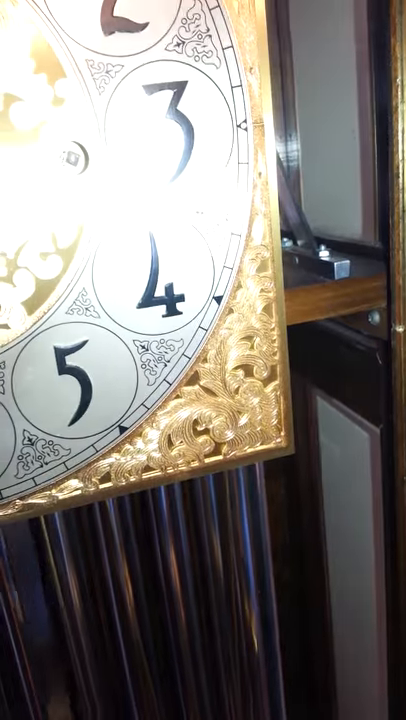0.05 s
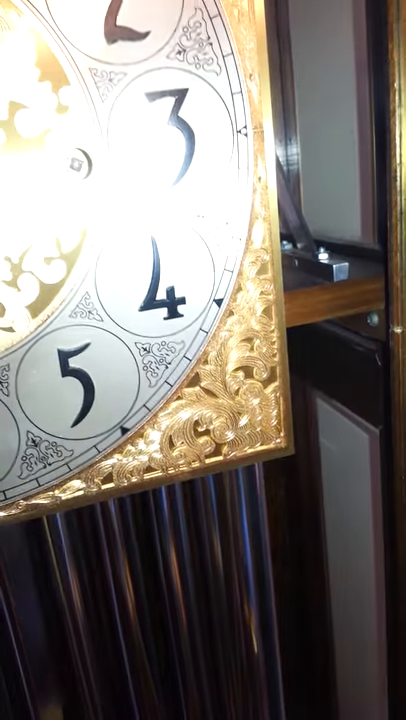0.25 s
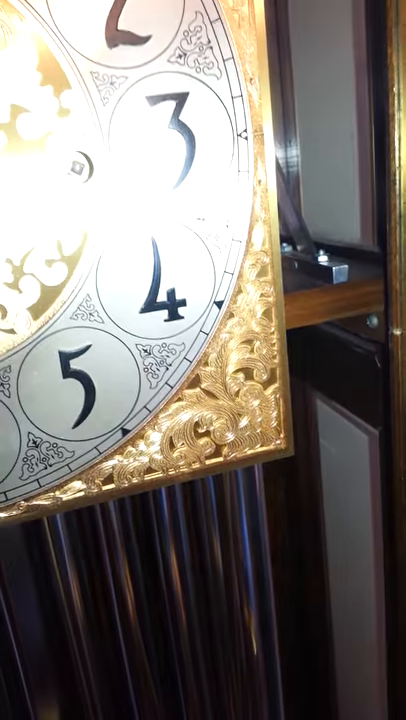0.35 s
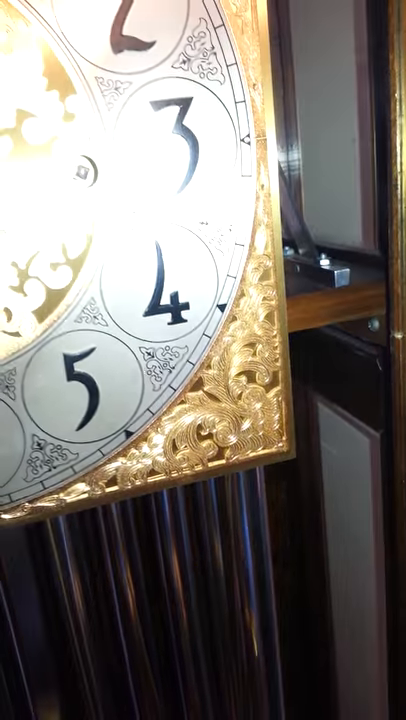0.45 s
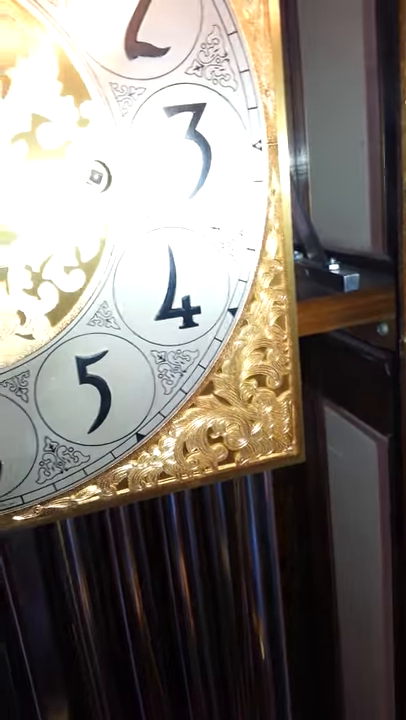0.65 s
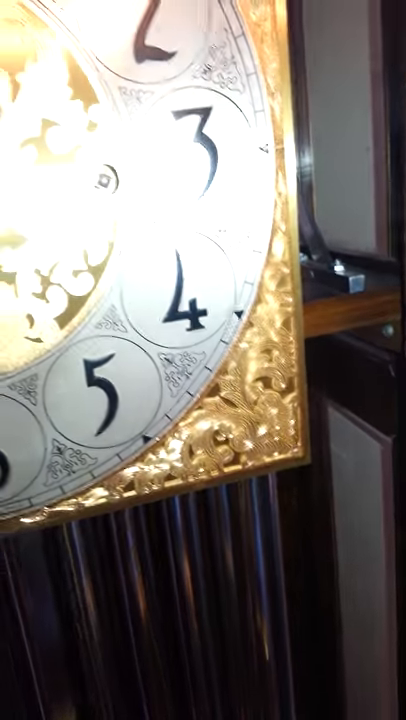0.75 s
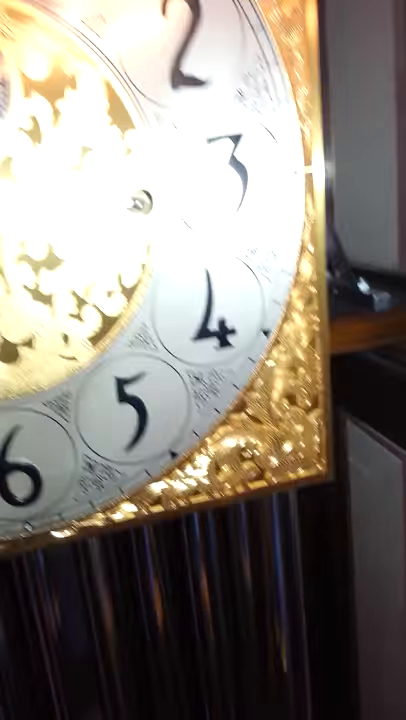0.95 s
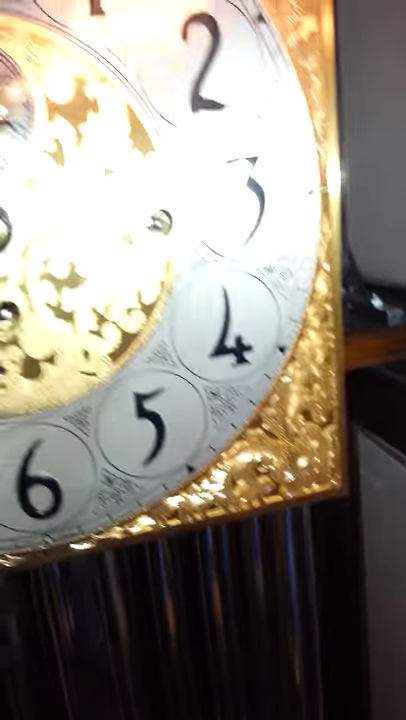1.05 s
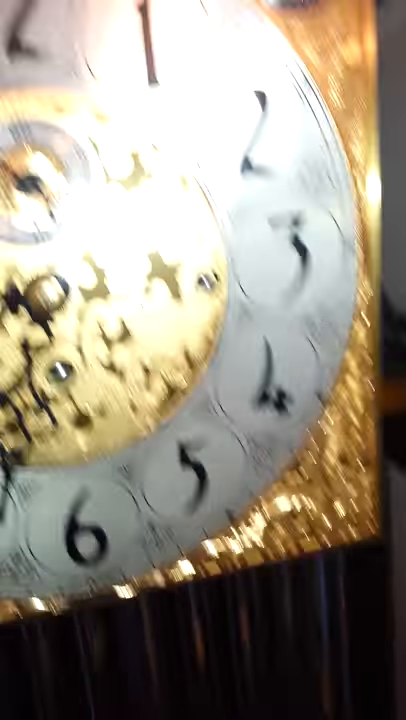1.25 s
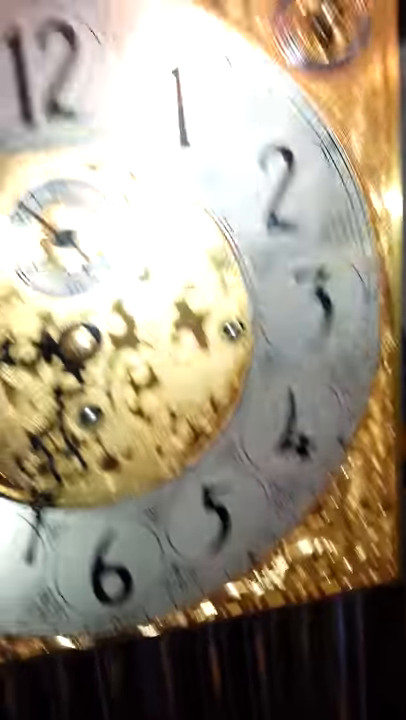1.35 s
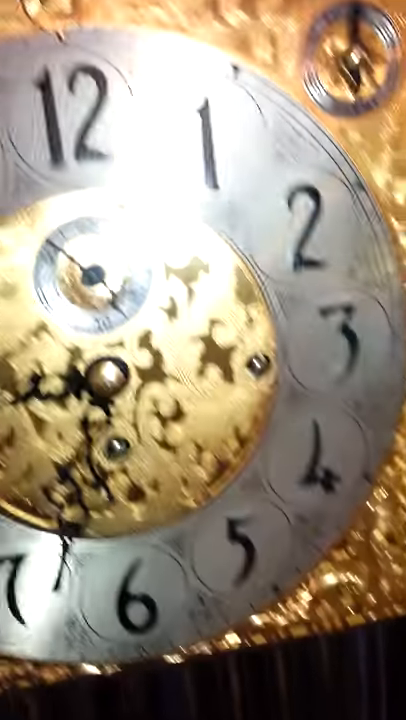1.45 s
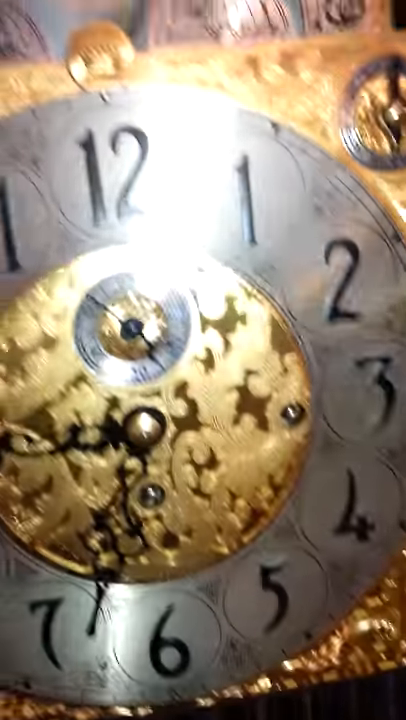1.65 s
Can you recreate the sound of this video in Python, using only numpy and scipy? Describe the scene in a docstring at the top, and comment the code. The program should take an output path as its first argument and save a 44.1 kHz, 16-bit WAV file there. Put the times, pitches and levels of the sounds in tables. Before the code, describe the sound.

Close up, a tall wooden clock gives a crisp metallic tick, a faint whirr and a softer, hollow tock. Small knocks from the mechanism follow, with the low hum and hiss of a quiet room underneath.

```python
"""A faint knock, then a rattling tick: a tall wooden case clock runs close by in a quiet room.
A brighter tock follows and sets the case booming, and soft knocks come after it.
Each blow of the mechanism rings in brass parts and wood, then dies away in the room.
A faint whirr lingers between tick and tock, over a low hum and soft hiss."""
import sys
import numpy as np
from scipy import signal
from scipy.io import wavfile

SR = 44100
rng = np.random.default_rng(int(sys.argv[2]) if len(sys.argv) > 2 else 0)


def master_out(mix):
    """Clip the mix to full scale and print it as 16-bit PCM to the path in sys.argv[1]."""
    frames = np.transpose(np.atleast_2d(mix))
    ceiling = np.clip(frames, -1, 1)
    pcm = np.round(ceiling * 32767).astype(np.int16)
    wavfile.write(sys.argv[1], SR, pcm)


N = 74970
TIME = np.arange(N) / SR
SIDES = np.array([[1], [-1]])  # left, right
EDGES = np.geomspace(22, 16000, 30)  # borders of the noise bands [Hz]
CENTRES = np.sqrt(EDGES[1:] * EDGES[:-1])

# hits that make up the tick (time [s], level [dB], brightness [dB/octave], lean to the left [dB])
TICK_HITS = [(0.214, -27, 0, -1), (0.2172, -22, 2, 4.5), (0.224, -28.5, 2.5, -5), (0.235, -24, -0.5, 4.5),
             (0.2369, -22.5, 1.5, -2), (0.2408, -27, -8, -4), (0.2695, -38, 7.5, 6),
             (0.2731, -36.5, 7.5, 10), (0.280, -36.5, 5, 0), (0.290, -49, -7, 7)]
# tone colour of the tick's noise (frequency [Hz], relative level [dB])
TICK_TONE = [(90, -37), (190, -13.5), (300, -20), (420, -14.5), (600, -17), (1000, -10.5), (1400, -12),
             (2000, 2), (2550, -3), (3100, -1), (3700, -14), (5600, -17.5), (8000, -26), (14000, -29.5)]
# pitches heard in the tick's ring, some in close clusters from the quick double click
# (pitch [Hz], level [dB], time to fade by 60 dB [s])
TICK_PITCHES = [(189, -27, .8), (325, -26, .4), (415, -23, .3), (451, -26, .45), (834, -28, .35),
                (900, -24, .2), (1058, -24, .36), (1335, -23, .14), (1577, -23, .3), (1852, -16.5, .21),
                (1944, -19, .15), (2055, -21, .25), (2105, -21, .35), (2144, -21, .3), (2240, -23, .25),
                (2494, -22, .18), (2808, -21, .2), (3012, -17.5, .19), (3052, -19, .19), (3092, -18, .19)]
# short, hard notes of the pallet, which stops the gear (pitch [Hz], level [dB], fade time [s])
PALLET_NOTES = [(1950, -6, .012), (2500, -12, .012), (3100, -1.5, .014), (4480, -30, .06), (5640, -23, .06)]
def tick(bands):
    """A quick rattle of hits, each with a hard ping from the pallet and a longer ring."""
    clicks = blows(bands, TICK_HITS, TICK_TONE, fade_s=0.014, room_db=-8.5)
    ringing = ring(TICK_HITS, TICK_PITCHES, swell_cycles=1, level_db=-4.5)
    pallet = ring(TICK_HITS, PALLET_NOTES, swell_cycles=1.1, level_db=0.5)
    return clicks + ringing + pallet


# hits that make up the tock (time [s], level [dB], brightness [dB/octave], lean to the left [dB])
TOCK_HITS = [(0.8055, -43, -3.5, -7), (0.8148, -30, 1, -1), (0.8175, -32.5, 3, 6), (0.825, -36.5, -4.5, -2)]
# tone colour of the tock's noise (frequency [Hz], relative level [dB])
TOCK_TONE = [(90, -39), (200, -4.5), (500, -7.5), (1000, -1.5), (1600, 1), (2600, 5), (3900, -3),
             (5600, -6.5), (8000, -14.5), (11000, -26), (14000, -15)]
# low notes of the case, high notes of its fittings (pitch [Hz], level [dB], fade time [s])
CASE_NOTES = [(188.5, -11, .8), (281, -19, .4), (377, -15, .35), (453, -14, .42), (571, -20, .29),
              (743, -18, .3), (958, -16, .2), (1577, -1, .07), (2378, -10, .11), (2729, -13, .1),
              (5615, -12, .06), (8450, -16, .05)]
# the catch lets go (time [s], level [dB])
CATCH_RELEASE = [(0.8054, -36)]
# notes of the catch (pitch [Hz], level [dB], fade time [s])
CATCH_NOTES = [(1600, -15, .05), (2471, 0, .12), (2730, -8, .08), (3090, -3, .06), (4334, -19, .06),
               (5615, -14, .05), (5730, -16, .04), (8150, -22, .03)]
def tock(bands):
    """The catch pings as it lets go, and the hits set the wooden case booming."""
    clack = blows(bands, TOCK_HITS, TOCK_TONE, fade_s=0.074, room_db=0)
    boom = ring(TOCK_HITS, CASE_NOTES, swell_cycles=11, level_db=1)
    ping = ring(CATCH_RELEASE, CATCH_NOTES, swell_cycles=1.8, level_db=1.5)
    return clack + boom + ping


# soft knocks (time [s], level [dB], brightness [dB/octave], lean to the left [dB])
KNOCK_HITS = [(0.015, -50.5, 5.5, -14), (0.3101, -38, -4.5, 3.5), (1.2908, -39, -1.5, -2),
              (1.305, -43, -1, 0), (1.594, -55, 10, 14), (1.607, -56, 7, 0)]
# tone colour of the knocks' noise (frequency [Hz], relative level [dB])
KNOCK_TONE = [(100, -40), (450, -20.5), (750, -3.5), (1200, -15), (1700, -1.5), (2400, -9), (3200, -1.5),
              (4500, -36), (8000, -29.5), (14000, -50)]
# notes of the knocked wood (pitch [Hz], level [dB], fade time [s])
WOOD_NOTES = [(802, -14, .29), (1061, -11, .17), (1206, -18, .3), (1595, -7, .12), (1760, -6, .12),
              (2094, -14, .13), (3219, -19, .11)]
def knocks(bands):
    """Gentle hits from the mechanism make the wood ring briefly."""
    taps = blows(bands, KNOCK_HITS, KNOCK_TONE, fade_s=0.038, room_db=-5.5)
    return taps + ring(KNOCK_HITS, WOOD_NOTES, swell_cycles=0.5, level_db=-3)


# how long the room echoes (frequency [Hz], fade time [s])
ECHO_FADE = [(200, 0.7), (450, 0.434), (1000, 0.4644), (2200, 0.28), (5000, 0.3934), (14000, 0.75)]
# how strongly the room answers a hit (frequency [Hz], relative level [dB])
ECHO_LEVEL = [(180, 2.5), (420, 6.5), (800, -9.5), (2000, -11), (5000, -14), (14000, -16.5)]
# which side the clock is louder on (frequency [Hz], lean to the left [dB])
CLOCK_LEAN = [(150, 2), (400, -2.5), (900, 0), (1500, 8), (2300, 8.5), (3200, 2), (4500, -3), (9000, -6),
              (14000, -5)]
def blows(bands, hits, tone, fade_s, room_db):
    """Each hit starts a short, noisy ring; the room answers, later and louder in the bass."""
    out, age = np.zeros((2, N)), TIME[:SR * 3 // 4]
    for hz, gain, noise in zip(CENTRES, band_gains(tone), bands):
        direct = decay(age, rise_s=0.0012, fade_s=fade_s)
        echo = decay(age, rise_s=9.6 / hz, fade_s=at_hz(ECHO_FADE, hz))
        echo *= from_db(room_db + at_hz(ECHO_LEVEL, hz))
        shape, power = direct ** 2 + echo ** 2, np.zeros((2, N))
        octaves = np.log2(np.clip(hz, 1000, 8000) / 2500)
        for start_s, db, brightness, lean_db in hits:
            start = int(start_s * SR)
            level = from_db(db + brightness * octaves) * pan(lean_db + at_hz(CLOCK_LEAN, hz))
            power[:, start:start + len(age)] += level ** 2 * shape[:N - start]
        out += gain * np.sqrt(power) * noise
    return out


# how alike the left and right sides sound (frequency [Hz], likeness [1 = the same])
SIDE_LIKENESS = [(50, -0.25), (180, 0.92), (330, 0.28), (700, .5), (1500, 0.1), (3000, 0.09), (6000, 0.02),
                 (14000, 0)]
def ring(hits, pitches, swell_cycles, level_db):
    """Each hit rings at the listed pitches, which reach left and right a little out of step."""
    out = np.zeros((2, N))
    for hz, pitch_db, fade_s in pitches:
        shape, power = decay(TIME, swell_cycles / hz, fade_s) ** 2, np.zeros(N)
        for start_s, db, *_ in hits:
            start = int(start_s * SR)
            power[start:] += from_db(db + pitch_db + level_db) ** 2 * shape[:N - start]
        spread = np.arccos(at_hz(SIDE_LIKENESS, hz)) * rng.choice([-1, 1])
        phase = 2 * np.pi * (hz * TIME + rng.random()) + SIDES * spread / 2
        out += np.sqrt(power) * np.sin(phase) * pan(at_hz(CLOCK_LEAN, hz))
    return out


def noise_bands():
    """Equally strong bands of stereo noise, from low to high, each with its own side likeness."""
    white, bands = rng.standard_normal((2, 2, N + SR // 4)), []
    for k, hz in enumerate(CENTRES):
        bandpass = signal.butter(3, EDGES[k:k + 2], "band", fs=SR, output="sos")
        pair = signal.sosfilt(bandpass, white[k % 2])[:, -N:]
        mid, side = pair / pair.std(axis=1, keepdims=True)
        alike = at_hz(SIDE_LIKENESS, hz)
        bands.append(np.sqrt((1 + alike) / 2) * mid + np.sqrt((1 - alike) / 2) * side * SIDES)
    return bands


# the whirr swells and fades (time [s], level [dB])
WHIRR_LEVEL = [(.25, -80), (.36, -64), (.66, -63), (.77, -73), (.9, -82)]
def whirr(pitch_hz=2030, width_hz=210):
    """Faint noise rings in the works around one pitch, between tick and tock."""
    radius = np.exp(-np.pi * width_hz / SR)
    poles = [1, -2 * radius * np.cos(2 * np.pi * pitch_hz / SR), radius ** 2]
    noise = signal.lfilter([1, 0, -1], poles, rng.standard_normal((2, N)))
    level = from_db(np.interp(TIME, *np.transpose(WHIRR_LEVEL)))
    return level * pan(at_hz(CLOCK_LEAN, pitch_hz)) * noise / noise.std()


# tone colour of the room's rumble and hiss (frequency [Hz], relative level [dB])
AIR_TONE = [(25, -9), (42, -17), (62, -1.5), (100, -5), (160, 2.5), (220, 0.5), (330, -3), (600, -12),
            (1200, -17.5), (2100, -13.5), (3300, -22), (6500, -26), (10000, -22.5), (14000, -23.5)]
# which side that noise is louder on (frequency [Hz], lean to the left [dB])
AIR_LEAN = [(60, -4), (200, 0), (500, 2), (1200, 0.5), (2200, 7), (4500, -2), (14000, 0.5)]
# its middle range rises and dips (time [s], boost [dB])
AIR_SWELL = [(0, 1.5), (.18, -1), (.45, 3), (.7, 3), (1.1, 4.5), (1.25, 2.5), (1.42, 5), (1.55, 4.5),
             (1.62, 6.5), (1.7, 5.5)]
def room_air(level_db=-57, flicker_db=0.5):
    """The quiet room rumbles and hisses with a slight flicker."""
    out, swell_db = 0, np.interp(TIME, *np.transpose(AIR_SWELL))
    for hz, gain, noise in zip(CENTRES, band_gains(AIR_TONE), noise_bands()):
        level = from_db(level_db + flicker_db * drift(14.6) + swell_db * (500 < hz < 5000))
        out += gain * level * pan(at_hz(AIR_LEAN, hz)) * noise
    return out


# notes of the hum (pitch [Hz], level [dB])
HUM_NOTES = [(274, -62), (597, -72.5)]
def hum():
    """Two low, faint tones waver slightly."""
    return sum(np.sqrt(2) * from_db(db) * np.sin(2 * np.pi * hz * TIME + 0.22 * drift(6.8))
               for hz, db in HUM_NOTES)


def from_db(db):
    """Turn decibels into a multiplier."""
    return 10 ** (np.asarray(db) / 20)


def pan(lean_db):
    """Left and right multipliers, with the left louder by lean_db."""
    return from_db(SIDES * lean_db / 2)


def at_hz(table, hz):
    """Look up a frequency in a table, with octaves evenly spaced."""
    frequencies, values = np.transpose(table)
    return np.interp(np.log(hz), np.log(frequencies), values)


def band_gains(tone):
    """Share a total power of 1 among the bands to give a tone colour."""
    gain = from_db(at_hz(tone, CENTRES)) * np.sqrt(CENTRES)
    return gain / np.linalg.norm(gain)


def decay(age, rise_s, fade_s):
    """Swell, then fall by 60 dB every fade_s seconds."""
    return (1 - np.exp(-age / rise_s)) * np.exp(-np.log(1000) * age / fade_s)


def drift(rate_hz):
    """A slow random wander, about 1 either way."""
    return np.interp(TIME * rate_hz, np.arange(200), rng.standard_normal(200))


def scene():
    """The clock in its quiet room."""
    bands = noise_bands()
    return tick(bands) + tock(bands) + knocks(bands) + whirr() + room_air() + hum()


def record(dry):
    """The highest treble is cut away steeply."""
    cutoff_hz = 14620
    return signal.sosfilt(signal.ellip(12, .1, 70, cutoff_hz, fs=SR, output="sos"), dry)


dry = scene()
out = record(dry)
master_out(out)
```